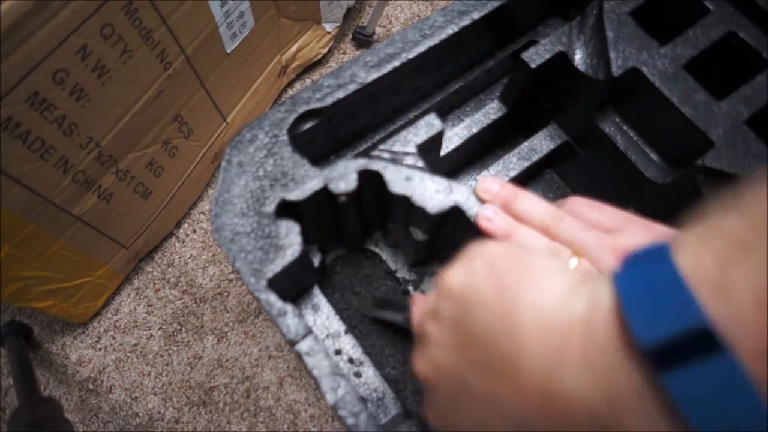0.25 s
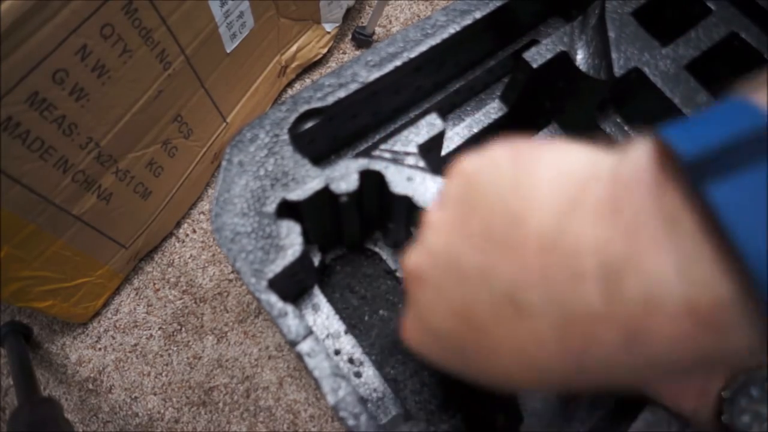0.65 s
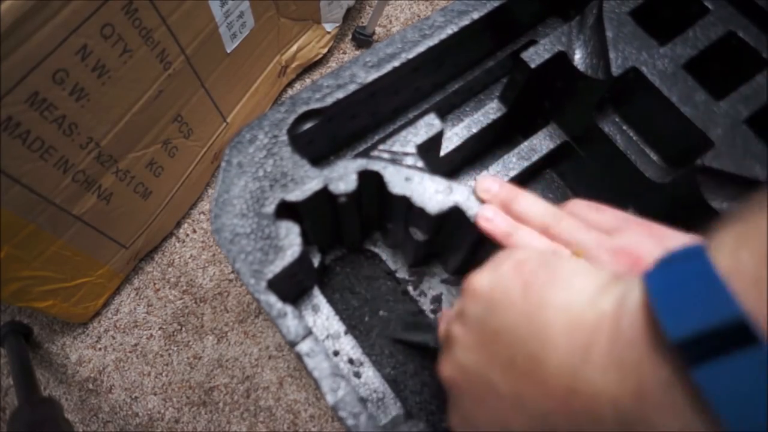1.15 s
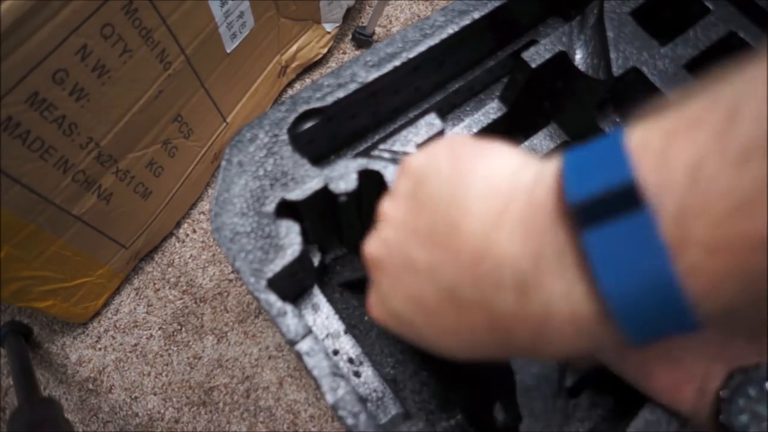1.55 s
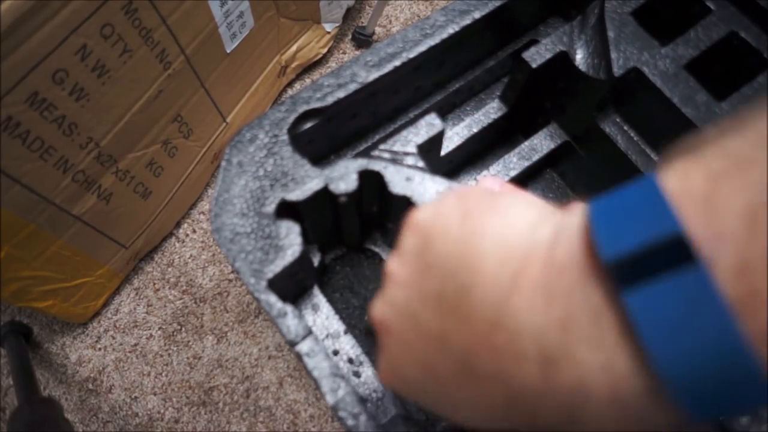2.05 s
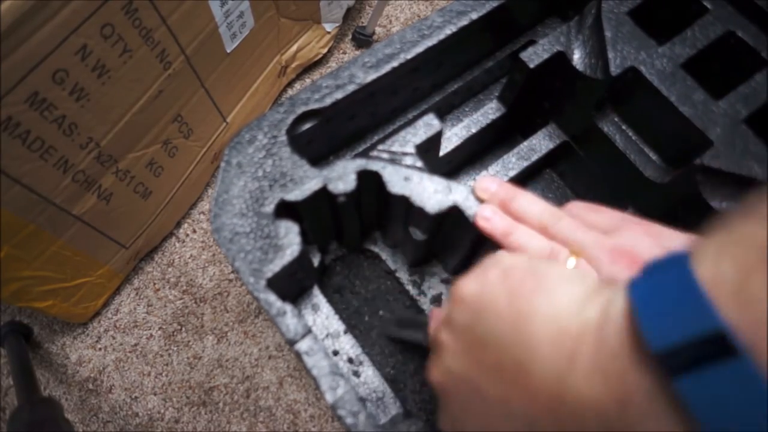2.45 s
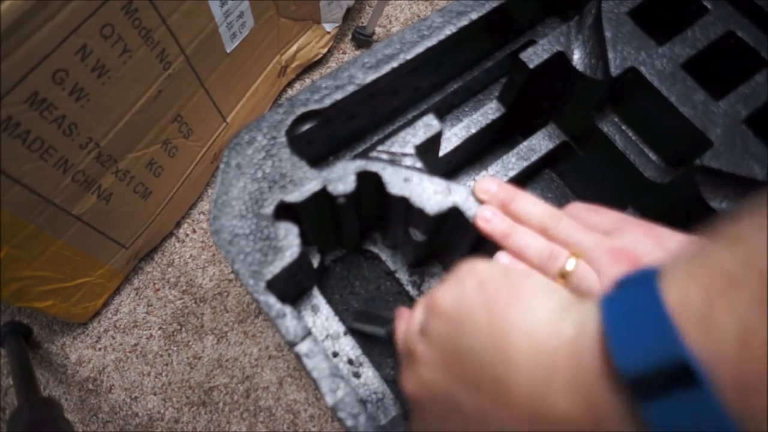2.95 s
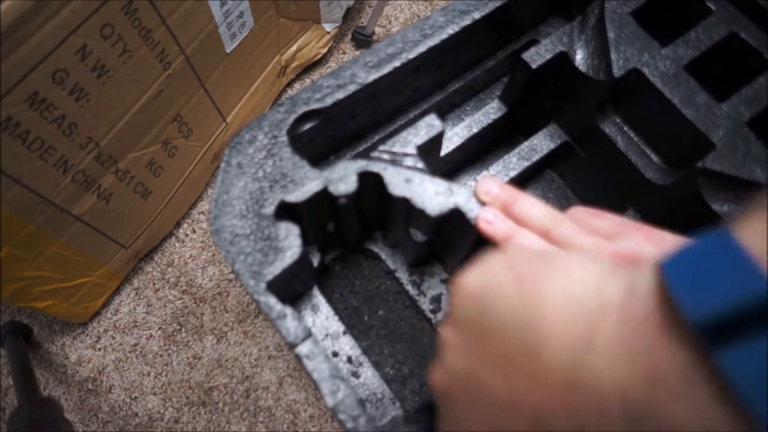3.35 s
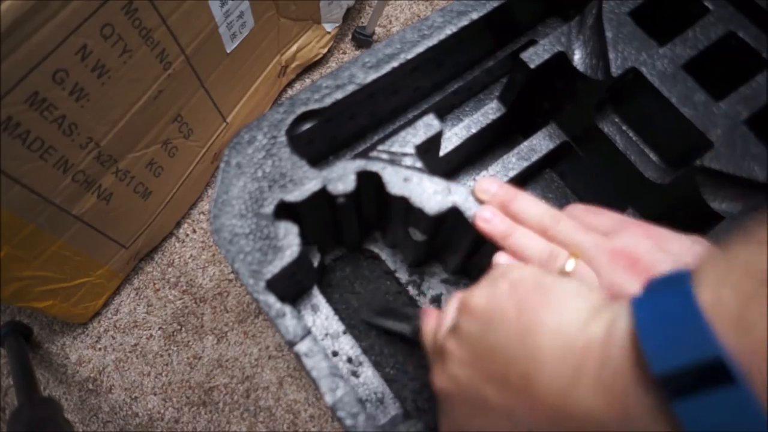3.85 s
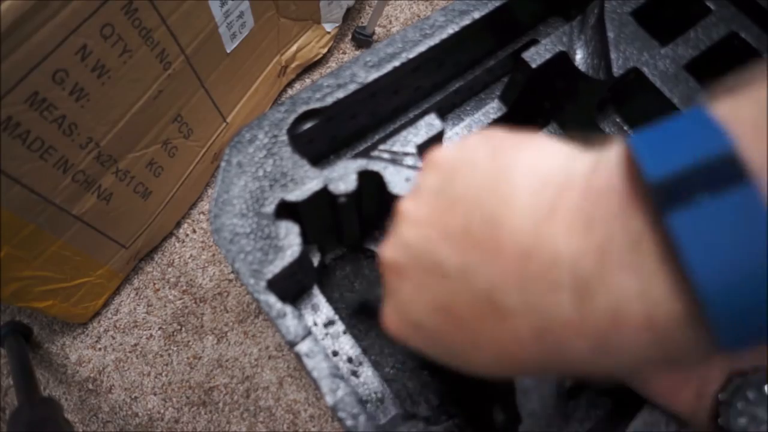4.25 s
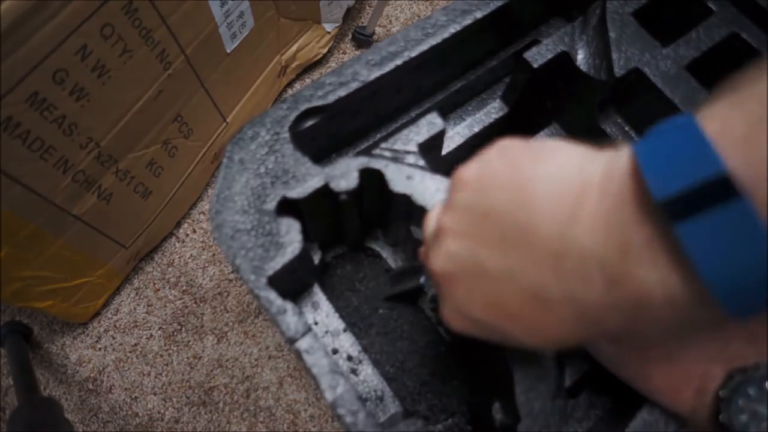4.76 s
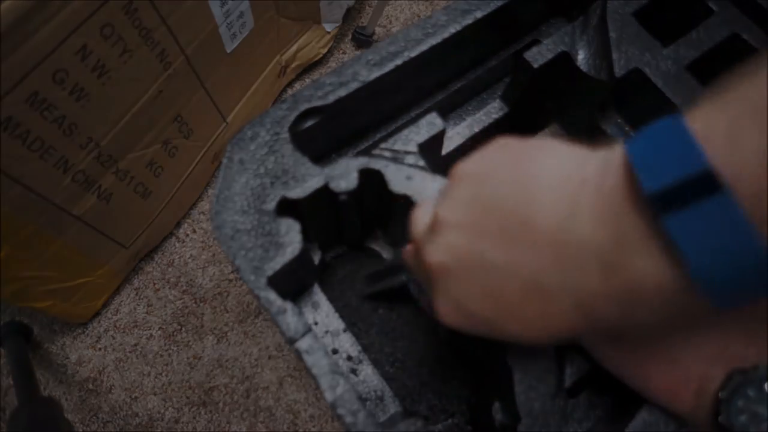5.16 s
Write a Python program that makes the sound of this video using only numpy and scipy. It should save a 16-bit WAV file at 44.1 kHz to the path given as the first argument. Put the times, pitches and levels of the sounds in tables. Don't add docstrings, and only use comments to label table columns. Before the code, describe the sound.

A flat blade scrapes in short strokes through brittle bead foam, each push a crunchy burst of bright cracks, knocks and hollow thumps in a small room.

```python
import sys
import numpy as np
from scipy import signal
from scipy.fft import rfft, irfft, next_fast_len
from scipy.io import wavfile
from scipy.ndimage import uniform_filter1d

SR = 44100
rng = np.random.default_rng(int(sys.argv[2]) if len(sys.argv) > 2 else 0)


def wav_record(signal):
    frames = np.transpose(np.atleast_2d(signal))
    bounded = np.clip(frames, -1, 1)
    quanta = np.round(bounded * 32767).astype(np.int16)
    wavfile.write(sys.argv[1], SR, quanta)


def voltage_ratio(decibels):
    exponent = np.asarray(decibels, float) / 20
    return 10 ** exponent


N = 237775


def colour(x, table):
    hz, db = np.transpose(table)
    size = next_fast_len(N + 4096)
    f = np.log(np.arange(size // 2 + 1) * SR / size + 1)
    outside = np.maximum(np.log(hz[0]) - f, 0) + np.maximum(f - np.log(hz[-1]), 0)
    gain = voltage_ratio(np.interp(f, np.log(hz), db) - 12 * outside)
    return irfft(rfft(x, size) * gain, size)[..., :N]


def noise(table, alike_hz):
    mid, side = rng.standard_normal((2, N))
    side = colour(side, [(alike_hz / 16, -24), (alike_hz, 0), (SR / 2, 0)])
    both = colour(np.array([mid + side, mid - side]), table)
    return both / np.sqrt(np.mean(both ** 2))


def rings(start_s, peak_db, part, count, wide, hz_scale=1):
    hz, octaves, cycles, trim_db = part
    size = int(cycles * SR / (hz * np.quantile(hz_scale, 0.1)))
    t = np.arange(size) / SR
    wave = 0
    for k in range(count):
        pitch, phase, lead, long = rng.random((len(start_s), 4)).T[:, :, None] - 0.5
        place = (k + 0.5 + pitch) / count - 0.5
        f = hz * np.reshape(hz_scale, (-1, 1)) * 2 ** (octaves * place)
        attack = (1 - np.exp(-t * f * 3.35)) ** 2
        decay = np.exp(-np.log(1000) * t * f / (cycles * 2 ** (2.06 * long)))
        apart = wide * lead * np.sqrt(f / 8000) * np.array([1, -1])[:, None, None]
        tone = np.sin(2 * np.pi * f * t + 3.95 * phase + apart)
        wave = wave + voltage_ratio(13.3 * long) * attack * decay * tone
    loudest = uniform_filter1d(np.sum(wave ** 2, axis=0), size=28).max(axis=1)
    wave = wave * (voltage_ratio(peak_db + trim_db) / np.sqrt(loudest))[:, None]
    at = ((start_s[:, None] * SR).astype(int) + np.arange(size)).ravel()
    return np.array([np.bincount(at, port.ravel(), N + size)[:N] for port in wave])


def swells(mid_s, length_s):
    t = np.arange(N) / SR
    return np.exp(-2 * (2 * (t - mid_s) / length_s) ** 4)


# [f/Hz, level/dB per Hz]
HUM_SPECTRUM = [(30, -3), (70, -18), (110, 4), (200, -2.5), (470, 9), (650, -3), (1500, -5), (3300, -22),
                (8000, -12.5), (11000, -31)]


def hum():
    return voltage_ratio(-63.5) * noise(HUM_SPECTRUM, 2500)


# [f/Hz, level/dB]
ROOM_SPECTRUM = [(100, 3.5), (330, -3), (460, 1), (650, -5), (2000, 0.5), (4600, -6.5), (8500, -4),
                 (11000, -7)]


def room(x):
    low_t60_s, high_t60_s, room_db = 0.57, 0.39, -12
    t = np.arange(N) / SR
    low = np.exp(-np.log(1000) * t / low_t60_s)
    high = np.exp(-np.log(1000) * t / high_t60_s)
    echo = noise(ROOM_SPECTRUM, 2300)
    bass = colour(echo, [(20, -9.0), (700, -5.5), (2800, -19.5)])
    build_up = np.clip(t / 0.024 - 0.3, 0, 1)
    echo = (bass * low + (echo - bass) * high) * build_up
    echo = echo[:, :SR] / np.sqrt(np.sum(echo ** 2) / 2)
    return signal.fftconvolve(x[None], echo, axes=1)[:, :N] * voltage_ratio(room_db)


# [f/Hz, level/dB per Hz]
RUSTLE_SPECTRUM = [(150, 6), (500, 23), (2000, 8.5)]
# [f/Hz, level/dB per Hz]
HISS_SPECTRUM = [(2500, -4), (5000, -7.5), (8300, -0.5), (11000, -13)]
# [middle t/s, length t/s, hiss level/dB,
# rustle minus hiss level/dB]
BRUSH_STROKES = [(0.046, 0.04, -61.5, 12), (0.127, 0.027, -72, -8), (0.865, 0.046, -75, 21.5),
                 (0.97, 0.062, -64, 14.5), (1.57, 0.45, -77.5, 20), (1.494, 0.0043, -65, 9.5),
                 (1.572, 0.0042, -66, 6), (1.622, 0.0032, -57.5, -8), (2.228, 0.046, -56.5, 1),
                 (2.289, 0.061, -52, 4), (2.726, 0.018, -47.5, 14.5), (2.824, 0.02, -49, 13),
                 (2.897, 0.02, -49, -3), (2.93, 0.023, -47, 14.5), (3.649, 0.044, -56, 11.5),
                 (3.732, 0.045, -50.5, -18), (4.477, 0.1, -63.5, 3), (4.87, 0.088, -52.5, 1),
                 (5.064, 0.065, -55.5, -12.5), (5.144, 0.022, -44, 11),]


def brushing():
    mid, length, hiss_db, low_db = np.transpose(BRUSH_STROKES)[:, :, None]
    swell = swells(mid, length)
    steps = np.repeat(rng.standard_normal(N // 66 + 1), 66)[:N]
    grain = voltage_ratio(3.9 * uniform_filter1d(steps, size=44))
    hiss = noise(HISS_SPECTRUM, 14000) * (voltage_ratio(hiss_db) * swell).sum(axis=0)
    rustle = noise(RUSTLE_SPECTRUM, 9000) * (voltage_ratio(hiss_db + low_db) * swell).sum(axis=0)
    return (hiss + rustle) * grain * voltage_ratio(-10.0)


# [middle t/s, length t/s, level/dB]
SQUEAK_EVENTS = [
    (.951, .016, -72),
    (2.194, 0.015, -76),
    (3.67, .012, -66),
    (5.028, 0.017, -71),
]


def squeaks():
    squeak_hz, width_hz = 7930, 70
    mid, length, db = np.transpose(SQUEAK_EVENTS)[:, :, None]
    waver = uniform_filter1d(rng.standard_normal(N), size=44) * np.sqrt(44)
    tone = np.sin(2 * np.pi * np.cumsum(squeak_hz + width_hz * waver) / SR)
    return tone * (voltage_ratio(db) * swells(mid, length)).sum(axis=0)


def chatter(count=8):
    start_s, gap_s, level_db, tick_hz = 0.031, 0.0034, -59, 5400
    s = start_s + gap_s * (np.arange(count) + 0.27 * rng.random(count))
    return rings(s, np.full(count, level_db), (tick_hz, 0.4, 12, 0), count=3, wide=1.9)


# [t/s, level/dB, f/Hz]
BENCH_BUMPS = [
    (0.022, -46, 625),
    (0.026, -44.5, 1440),
    (0.894, -42, 231),
    (0.909, -43, 238),
    (0.917, -40, 302.6),
    (2.737, -31, 295),
    (3.187, -23, 418),
    (3.199, -39, 377),
    (3.649, -34, 1257),
    (5.091, -31, 305),
]


def bumps():
    s, db, hz = np.transpose(BENCH_BUMPS)
    return rings(s, db, (1.0, 0.8, 11.0, 4), count=3, wide=0.98, hz_scale=hz)


def stress(when, s, level_db, step_s=1 / 4000):
    size = int(N / SR / step_s) + 2
    at = (s / step_s).astype(int) + 1
    power = np.array([np.bincount(at, voltage_ratio(2 * row), size) for row in np.atleast_2d(level_db)])

    def fading(x, tau_s):
        return signal.lfilter([1], [1, -np.exp(-step_s / tau_s)], x)

    after, behind = fading(power, 0.004), fading(power, 0.015)
    lead_in = fading(power[:, ::-1], 0.0018)[:, ::-1] - power
    ahead = fading(power[:, ::-1], 0.008)[:, ::-1] - power
    pushing = 0.45 * np.sqrt(behind * np.abs(ahead))
    total = after + pushing + 0.5 * np.abs(lead_in) + 1e-12
    return np.squeeze(total[:, (when / step_s).astype(int)])


# [middle f/Hz or factor on thump f, spread/octaves, cycles to fade 60 dB, trim level/dB]
POP_MODES = [
    (8280, 0.77, 3.5, -9),
    (3170, 1.024, 5, -2),
    (1.133, 0.93, 4, -0.5),
]


def crackle(beads):
    rate_hz, scatter_db, trims_db = 2600, 3.5, (-23, -23, -16.5)
    s, thump = beads[0], beads[3]
    when, size, tone = rng.random((int(rate_hz * N / SR), 3)).T
    when = when * N / SR
    size_db = -scatter_db * np.log(0.034 + size)
    knots = np.arange(0, N / SR + 1, 0.012)
    patch = [np.interp(when, knots, row) for row in rng.standard_normal((len(knots), 6)).T]
    crack_scale = 2 ** (0.31 * patch[0])
    knock_scale = 2 ** (0.55 * patch[1])
    thump_hz = 750 * 2 ** (2.0 * (tone - 0.5) + 0.33 * patch[2])
    scales = crack_scale, knock_scale, thump_hz
    power = stress(when, s, beads[1:4])
    out = 0
    for k, part in enumerate(POP_MODES):
        toughness_db = 3.0 * np.minimum(patch[3 + k], 1)
        level_db = 10 * np.log10(power[k]) + size_db + trims_db[k] + toughness_db
        heard = level_db > -80
        out = out + rings(when[heard], level_db[heard], part, count=2, wide=0.79, hz_scale=scales[k][heard])
    grid = np.arange(0, N / SR, 0.004)
    effort = np.sqrt(uniform_filter1d(stress(grid, s, thump), size=6))
    shudder = np.interp(np.arange(N) / SR, grid, effort)
    return out + voltage_ratio(-32) * shudder * noise([(30, 6), (75, 0), (200, 7)], 45)


# [start t/s, length t/s, crack level/dB, knock and thump minus crack level/dB]
BLADE_JERKS = [(0.177, .02, -29, -1), (0.2207, .022, -23.5, -5), (0.258, .012, -40, 6.5),
               (0.313, .054, -26, -12), (0.397, 0.035, -27.5, -7), (0.4578, .04, -18.5, -7),
               (0.501, .03, -26.5, 0.5), (1.008, .015, -23, -8), (1.068, .03, -28, -3.5),
               (1.096, 0.025, -26, -5.5), (1.1343, .04, -13, -13.5), (1.2123, .012, -14.5, -19),
               (1.2388, .034, -19.5, -8), (1.6972, .054, -20, -5), (1.8194, .024, -21, -10),
               (1.866, .022, -22, -1.5), (2.3232, .062, -20, -10), (2.429, 0.014, -23.5, -1.5),
               (2.497, .06, -24, -6), (2.9594, .034, -22, -8.5), (3.1468, .054, -19.5, -9.5),
               (3.2416, .008, -17.5, -11), (3.747, .03, -21, -11.5), (3.881, .066, -20.5, -12.5),
               (3.9872, .054, -20, -7.5), (4.062, .02, -20, -12), (4.599, .064, -33, 3),
               (4.7286, .018, -36, 7.5), (5.1435, .05, -26.5, -4.5), (5.21, .052, -20.5, -7.5)]
# [t/s, crack level/dB, thump minus crack level/dB]
TOUGH_BEADS = [(0.2362, -14.5, -10), (0.2886, -13, -5.5), (0.319, -16, -8), (0.3782, -18, -21.5),
               (0.4669, -15, -4.5), (1.106, -14.5, -20), (1.1137, -17.5, -13), (1.1533, -26, -16),
               (1.2035, -16, -5.5), (1.7984, -15, -25), (2.2909, -15, -15), (2.3357, -25, -18),
               (2.4369, -9.5, -15), (2.4527, -13, -5.5), (2.4753, -9, -9.5), (2.7361, -19, -13),
               (2.9805, -22.5, -8.5), (3.06, -13.5, -11.5), (3.1027, -15, -13), (3.2176, -12, -11.5),
               (3.2297, -15.5, -13), (3.7762, -17.5, -7), (3.8139, -13.5, -8), (3.8827, -10.5, -12.5),
               (3.9528, -14.5, -3), (4.0173, -10, -13), (4.0317, -19, -14), (4.6382, -13.5, -17),
               (4.7556, -17.5, -18), (5.1604, -10.5, -13)]
# [t/s, knock level/dB, crack minus knock level/dB, thump minus knock level/dB]
KNOCKING_BEADS = [(0.1944, -26, -17, -4), (0.4395, -27.5, 14.5, -13), (0.9999, -19, 1, -3),
                  (1.0254, -17.5, -18, -2.5), (1.1937, -22, -2, 1), (1.7254, -26.5, 2, -4),
                  (1.7416, -21, 3.5, -0.5), (1.8048, -23, 7, -11), (1.826, -17.5, 6.5, -8),
                  (1.858, -19.5, 3, -10.5), (1.8767, -22.5, 9, -3.5), (1.9112, -19, -3, -10),
                  (1.9714, -20.5, -5.5, -23), (2.3089, -23, -8, -13), (2.3414, -20.5, -10, 3),
                  (2.9343, -22, -11, -1.5), (3.0406, -21, 1, -7), (3.0877, -15.5, -7.5, -10),
                  (3.2538, -22, 1, -12), (3.2659, -21, -7.5, 0), (3.9022, -29.5, 12, -1),
                  (3.9085, -21.5, -11, -2), (4.6967, -23, 7.5, 0.5), (4.7439, -19.5, 4, 2),
                  (4.7853, -18, -5.5, -9), (5.1781, -16.5, -3.5, -3.5), (5.2046, -20, -1, -10),
                  (5.2145, -23.5, -1, -15), (5.2655, -19, 0, -5)]
# [t/s, crack level/dB, knock and thump minus crack level/dB]
LONE_SNAPS = [(.0627, -48, -7), (.1338, -35, -6), (0.1811, -18, -8), (0.5305, -23, -3), (0.8627, -57, 7),
              (.9655, -31, -9), (0.9846, -23, -10), (1.291, -26, -6), (1.7823, -23.5, -10),
              (1.9264, -37.5, 11.5), (1.9688, -19, -42), (1.9917, -26, -10.5), (2.2257, -40, -17),
              (2.4034, -30, -13), (2.7576, -42.5, -10), (2.818, -34.5, -1), (2.8268, -34, -2),
              (2.8985, -41, -32), (2.9145, -32.5, -3), (3.65, -38, 4), (3.6554, -37.5, -16),
              (3.7422, -25, -3.5), (4.0947, -31, 2), (4.5952, -23, -14), (5.0595, -31, -16),
              (5.074, -32.5, -27), (5.081, -42.5, 7.5), (5.1003, -28, -2.5), (5.303, -32, -10)]
# [t/s, thump level/dB, f/Hz]
LUMP_THUMPS = [(0.2286, -20.5, 981), (.266, -19, 890), (0.355, -17.5, 1450), (0.4263, -18.5, 1250),
               (.481, -31, 640), (1.1226, -18.5, 740), (1.1815, -21.5, 690), (1.687, -24, 1110),
               (1.7126, -25.5, 1140), (1.8127, -18, 730), (2.3615, -18.5, 866), (2.9443, -14.5, 650),
               (3.1184, -17.5, 816), (3.162, -27, 1114), (3.1707, -12.5, 525), (3.1868, -17.5, 606),
               (3.239, -21.5, 1030), (3.7641, -19, 910), (4.6835, -19, 831.7), (4.6915, -19.5, 820),
               (5.0931, -21, 620), (5.2198, -22, 1090)]


def tears():
    beads_per_s, bead_scatter_db, dull_scatter_db = 95, 3.5, 3
    thump_hz, thump_octaves = 926, 0.46
    start, length, run_db, dull = np.transpose(BLADE_JERKS)
    jerk = np.repeat(np.arange(len(start)), np.ceil(length * beads_per_s).astype(int))
    place = np.arange(len(jerk)) - np.searchsorted(jerk, jerk)
    late = rng.random(len(jerk))
    size, knock, thump = rng.standard_normal((len(jerk), 3)).T
    progress = (place + late * (place > 0)) / np.bincount(jerk)[jerk]
    s = start[jerk] + length[jerk] * progress
    crack = run_db[jerk] + bead_scatter_db * np.minimum(size, 1)
    body = run_db[jerk] + dull[jerk]
    rows = [(s, crack, body + dull_scatter_db * knock, body - 0.1 + dull_scatter_db * thump)]
    s, db, low = np.transpose(TOUGH_BEADS)
    rows.append((s, db, db - 10, db + low))
    s, db, bright, low = np.transpose(KNOCKING_BEADS)
    rows.append((s, db + bright, db, db + low))
    s, db, dull = np.transpose(LONE_SNAPS)
    rows.append((s, db, db + dull - 1.0, db + dull + 1.0))
    s, db, hz = np.transpose(LUMP_THUMPS)
    rows.append((s, db - 2, db - 4.5, db))
    rows = np.hstack(rows)
    spread = np.clip(rng.standard_normal(rows.shape[1] - len(hz)), -2, 2)
    pitch = thump_hz * 2 ** (thump_octaves * spread)
    return np.vstack([rows, np.append(pitch, hz)])


def pops(beads):
    s, crack, knock, thump, hz = beads
    s = s - 0.0003
    out = rings(s, crack, POP_MODES[0], count=4, wide=1.74)
    out = out + rings(s, knock, POP_MODES[1], count=3, wide=2.8)
    return out + rings(s, thump, POP_MODES[2], count=3, wide=3.8, hz_scale=hz)


# [f/Hz, level/dB]
MIC_RESPONSE = [(80, -12.5), (200, -5.5), (1000, 0), (5000, 8.5), (8500, 16.5), (10600, 10.5)]


def scene():
    beads = tears()
    foam = pops(beads) + bumps() + crackle(beads) + brushing() + squeaks() + chatter()
    return colour(foam + room(foam.mean(axis=0)), MIC_RESPONSE) + hum()


def roll_off(x):
    return signal.sosfilt(signal.butter(12, 11980, fs=SR, output="sos"), x)


# [f/Hz, level/dB]
TOP_CUT = [(20, 0), (10900, 0), (11450, -34), (14000, -20), (16000, -40)]


def record(dry):
    ceiling, fade_in_s, fade_out_s = 0.35, 0.0081, 0.021
    t = np.arange(N) / SR
    fade_in = np.clip(0.35 + t / fade_in_s, 0, 1)
    fade_out = np.clip(0.5 + (N / SR - t) / fade_out_s, 0, 1)
    rounded = ceiling * np.tanh(dry / ceiling)
    mix = colour(rounded, TOP_CUT) * (fade_in * fade_out)
    return roll_off(mix)


dry = scene()
out = record(dry)
wav_record(out)
```